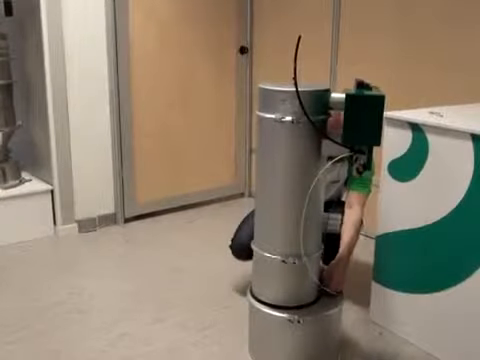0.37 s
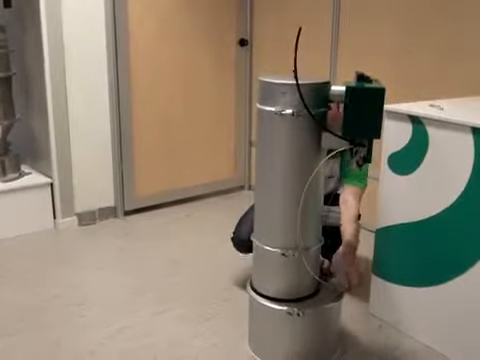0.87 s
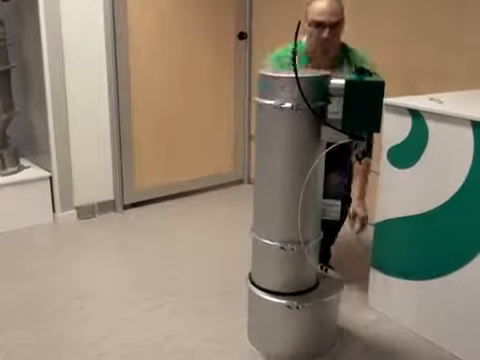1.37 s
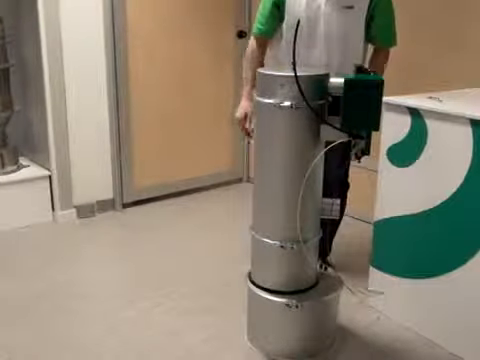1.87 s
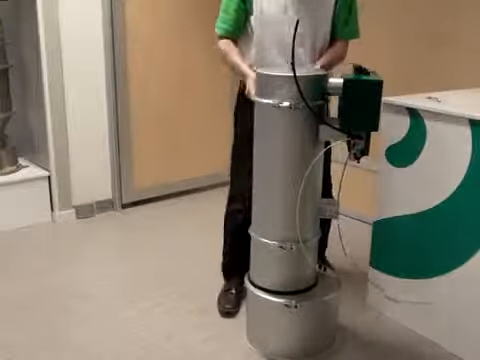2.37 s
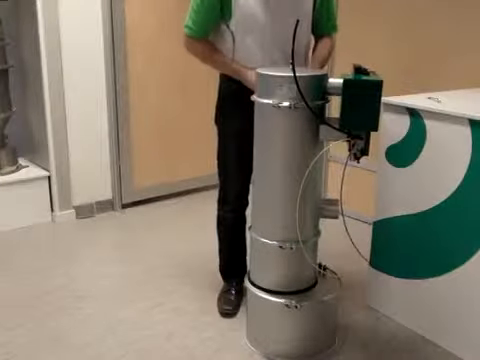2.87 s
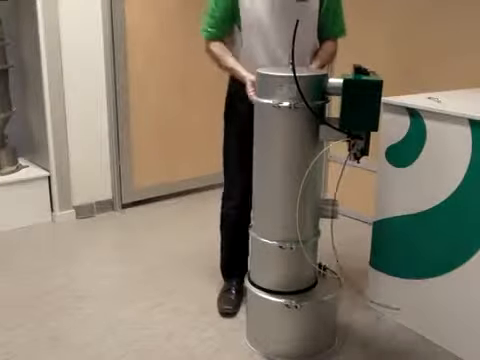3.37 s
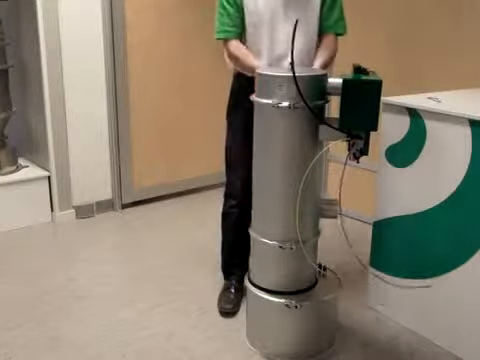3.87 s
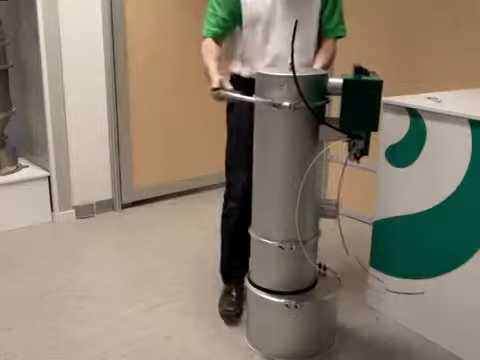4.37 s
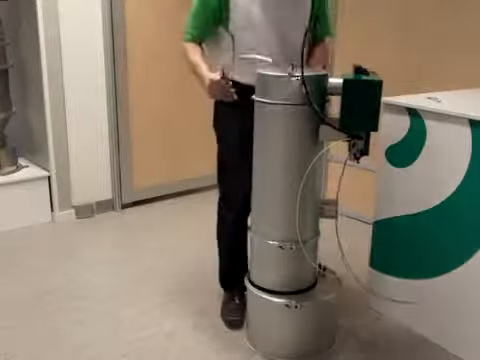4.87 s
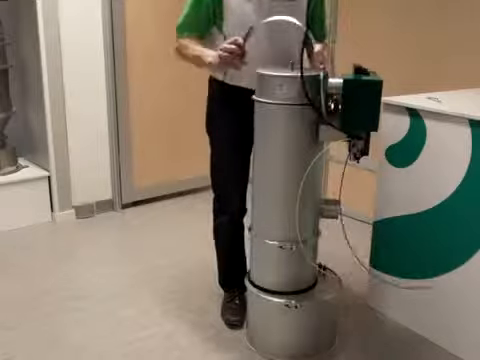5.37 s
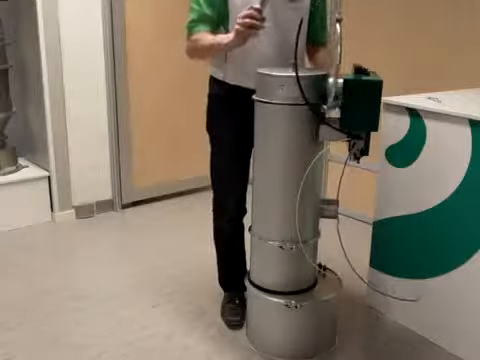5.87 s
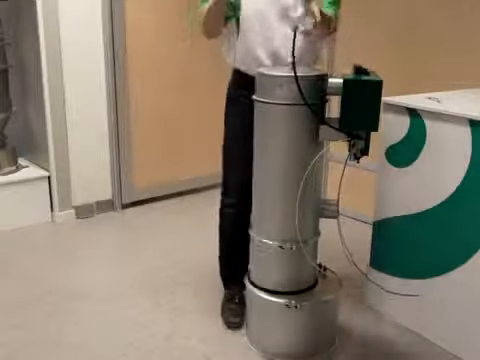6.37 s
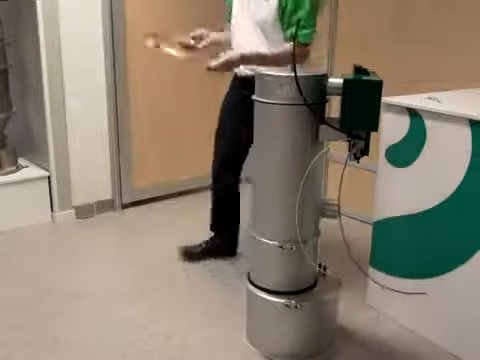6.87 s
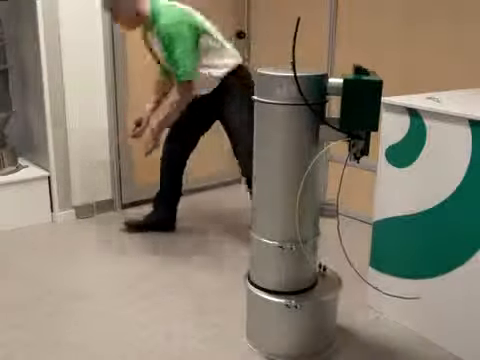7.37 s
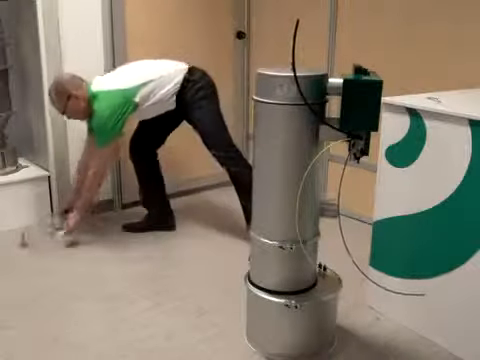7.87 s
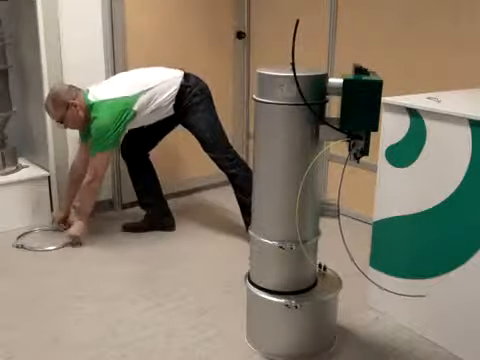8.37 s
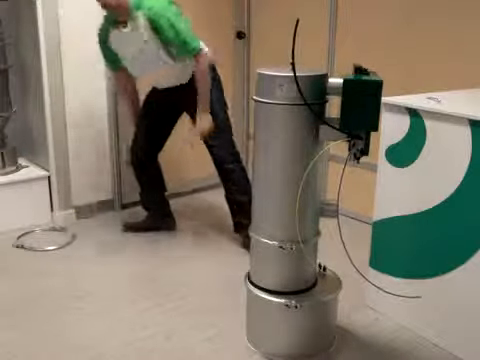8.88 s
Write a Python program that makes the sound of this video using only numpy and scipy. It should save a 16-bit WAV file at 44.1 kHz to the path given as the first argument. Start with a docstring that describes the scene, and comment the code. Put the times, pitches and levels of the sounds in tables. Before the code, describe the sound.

One early metal click and quiet taps, then hard latch snaps and irregular clanks against a hollow steel shell, the strongest with a short boomy ring. Light pings and clicks trail off as the ring is lifted away. A short pause, then it lands on the hard floor in two bursts of bright jangling and settles. Echoing bare room, constant low hiss, plain mono pickup.

```python
"""A steel clamp ring is unlatched, knocked against the lid and shell of a hollow steel machine, lifted off
and laid on a hard floor, where it rattles to rest. Each blow is a filtered noise snap with dying sines for
lid, shell or ring; the latch pings, clothes rustle and dull taps fall between. A bare room
answers the machine and the ring's jangle with two echoes and a sparse tail, over a steady hiss; the small
microphone has four narrow notches."""
import sys
import numpy as np
from scipy import signal
from scipy.fft import rfft, irfft
from scipy.io import wavfile
from scipy.ndimage import uniform_filter1d

SR = 44100
rng = np.random.default_rng(int(sys.argv[2]) if len(sys.argv) > 2 else 0)


def master_out(mix):
    """Clip the mix to full scale and print it as 16-bit PCM to the path in sys.argv[1]."""
    frames = np.transpose(np.atleast_2d(mix))
    ceiling = np.clip(frames, -1, 1)
    pcm = np.round(ceiling * 32767).astype(np.int16)
    wavfile.write(sys.argv[1], SR, pcm)


N = 396900  # 9 s


def gain_of(db):
    """Decibels to gain."""
    return 10 ** (np.asarray(db) / 20)


def read(points, hz):
    """Reads a table on a log-frequency axis."""
    f, value = np.transpose(points)
    return np.interp(np.log(hz + 1), np.log(f + 1), value)


def add(mix, s, sound):
    """Adds a sound at time s."""
    part = mix[round(s * SR):][:len(sound)]
    part += sound[:len(part)]


def loud(x):
    """Scales a blow so that its first 10 ms have an rms of one third, hence peak near 1."""
    return x / np.sqrt(np.mean(x[:SR // 100] ** 2)) / 3


def colour(x, db):
    """Causal filter with the given dB per bin: the phase follows from the log gain."""
    log_gain = np.log(gain_of(np.r_[db, db[-2:0:-1]]))
    response = np.fft.ifft(np.exp(np.conj(signal.hilbert(log_gain)))).real
    return signal.oaconvolve(x, response[:len(db) // 2])[:len(x)]


def noise(points):
    """Steady noise of rms 1 with the given spectrum."""
    spectrum = rfft(rng.standard_normal(N))
    x = irfft(spectrum * gain_of(read(points, np.fft.rfftfreq(N, 1 / SR))), N)
    return x / np.std(x)


def bank(modes, damping=1, split=0, count=1):
    """Half a second of one dying sine a mode; a bent or welded part adds close, faster-dying neighbours."""
    hz, db, t60 = np.repeat(modes, count, axis=0).T[:, :, None]
    neighbour = (np.arange(len(hz)) % count > 0)[:, None]
    hz = hz * (1 + split * neighbour * rng.standard_normal(hz.shape))
    t = np.arange(SR // 2) / SR
    fall_db = 60 * t * damping * (1 + neighbour) / t60
    return hz[:, 0], gain_of(db - 0.44 * neighbour - fall_db) * np.sin(2 * np.pi * hz * t)


def chatter(s, swell, spike=0.19):
    """Uneven micro-bounces that swell and then fade, with s seconds as the time constant of the fade."""
    t = np.arange(SR // 10) / max(s, 3e-4) / SR
    bounces = rng.standard_normal(len(t)) * rng.exponential(1, len(t)) ** spike
    return bounces * t ** swell * np.exp(-t)


def struck(modes, tilt_db, spread_db, rise=0.00053):
    """Each blow lands elsewhere, so it wakes the modes in other shares; the ringing builds over a moment."""
    share = gain_of(tilt_db + spread_db * rng.standard_normal(len(modes)))
    share = share * rng.choice([-1, 1], len(modes))
    build_up = 1 - np.exp(-np.arange(modes.shape[1]) / SR / max(rise, 1e-4))
    return loud(share @ modes * build_up)


def ticks(spells, per_s, spread_db):
    """Rows (s, dB) of unevenly spaced ticks of uneven size that fill each spell."""
    rows = []
    for start, length, db in spells:
        gap, size = rng.random((40, 2)).T
        times = start + np.cumsum(gap + .5) / per_s
        levels = db - spread_db * (1 + np.log(size + 0.095))
        rows += [(s, level) for s, level in zip(times, levels) if s < start + length]
    return rows


# Colour of the hiss. Each row: frequency in Hz, relative density in dB.
HISS_SPECTRUM = [(12, -51), (20, -9.5), (126, -9), (292, -6), (700, -9), (1180, -12.5), (2370, -14),
                 (2650, -20), (3500, -15.5), (5620, -17), (9830, -21.5), (15800, -27)]


def hiss():
    """Steady coloured noise under the whole place, at -56 dB rms."""
    return gain_of(-56) * noise(HISS_SPECTRUM)


# Clothes and shoes shuffle as the worker moves. Each row: time in seconds, level in dB (it glides between).
SHUFFLE_LEVELS = [(0.0, -58), (0.41, -74), (2.81, -62), (3.398, -56.5)]
# Colour of the cloth. Each row: frequency in Hz, relative density in dB.
CLOTH_SPECTRUM = [(150, -24), (400, 15), (1000, 14), (2500, 4), (6000, -7), (12000, -34.5)]


def shuffle():
    """Soft rustle of coloured noise that flutters a little and stops after the last row."""
    s, db = np.transpose(SHUFFLE_LEVELS)
    flutter_db = 0.19 * uniform_filter1d(rng.standard_normal(N), 900) * 30
    level_db = np.interp(np.arange(N) / SR, s, db, right=-99)
    return gain_of(level_db + flutter_db) * noise(CLOTH_SPECTRUM)


# Colour of the snap of steel on steel. Each row: frequency in Hz, relative level in dB.
CRACK_SPECTRUM = [(150, -103), (500, -11.5), (1000, -15.5), (2000, -11), (3200, -6), (4500, -3),
                  (6500, 1.5), (10000, -15.5), (13000, -22), (16000, -22)]


def crack(touch, hard_db, body_db=0):
    """The unpitched snap of steel on steel; a harder contact is brighter, a thin part has less body."""
    hz = np.fft.rfftfreq(4096, 1 / SR)
    tilt_db = hard_db * np.clip((hz - 4800) / 1200, 0, 1)
    tilt_db += (hard_db + 11.0) * np.clip((hz - 7500) / 4000, 0, 1)
    tilt_db += body_db * np.clip(2 - hz / 1000, 0, 1)
    return loud(colour(touch, read(CRACK_SPECTRUM, hz) + tilt_db))


# Low modes of the lid. Each row: frequency in Hz, relative level in dB, time to fall 60 dB in seconds.
LID_MODES = [(126, -15, 0.12), (201.7, -14, 0.61), (325, -9.5, 0.04), (358, -17, 0.16), (455, 4, 0.042),
             (527, -10, 0.078)]


def lid_boom():
    """Hollow boom: the lid's modes driven by a push of a few ms that sways at 430 Hz."""
    t = np.arange(SR // 140) / SR
    push = signal.windows.hann(len(t)) * (0.012 + np.cos(2 * np.pi * 430 * t))
    return loud(signal.fftconvolve(bank(LID_MODES)[1].sum(0), push))


# Modes of the shell. Each row: frequency in Hz, relative level in dB, time to fall 60 dB in seconds.
SHELL_MODES = [(680, -10, 0.039), (800, -5.5, 0.011), (958, 0, 0.021), (1090, -3, 0.015), (1330, 1, 0.017),
               (1600, 3, 0.012), (1844, 2, 0.016), (1953, 5, 0.01), (2150, -3.5, 0.03), (2300, -1, 0.024),
               (3700, 3, 0.013), (4280, -6.5, 0.016)]


def shell_bank():
    """The welded shell: each mode spreads into a dozen close, short notes."""
    return bank(SHELL_MODES, split=0.11, count=12)


# Loose parts drag and tick along the machine. Each row: start in seconds, length in seconds, tick level in dB.
DRAG_SPELLS = [(2.795, .022, -34.5), (3.91, 0.24, -36.5), (4.455, .05, -42), (5.2, 0.29, -51)]


def drags():
    """Each tick of a drag is a small blow: start, level, lid and shell re crack, hardness."""
    return [(s, db, -8, -4.5, -10) for s, db in ticks(DRAG_SPELLS, per_s=83, spread_db=-1)]


LEAD_S = .004  # snap and shell ringing start this long before the row time and swell up
# Blows on the machine. Each row: time in seconds, crack level in dB, lid boom in dB re crack,
# shell ring in dB re crack, hardness as treble in dB.
MACHINE_BLOWS = [(0.1967, -26.5, -34, -15.5, -8.5), (0.5383, -40.5, -31, -2.5, -8),
                 (0.5876, -45, -6, 5, -6), (2.316, -54, -5, 12, -1), (2.3515, -40, -12, -1.5, -7),
                 (2.8211, -13.5, -39, -14, -7.5), (2.858, -23, -5.5, -3.5, -8), (3.357, -39, -3, 1.5, -18),
                 (3.4318, -15, -15, -8, -7.5), (3.7665, -28.5, -0.5, 4.5, -3.5),
                 (3.9473, -18, -11.5, -3.5, -8.5), (4.0082, -24, -15, 1.5, -13),
                 (4.0444, -15.5, -16, -9.5, -7), (4.137, -26, -20, -9, -8), (4.4633, -39.5, 2, 4.5, -10),
                 (4.474, -38, 9, -3, 3), (4.4838, -40.5, 9.5, 6, -27), (4.573, -14.5, 1, -4.5, -1),
                 (4.616, -23.5, 0, 4.5, -25), (4.9009, -18, -4.5, 1.5, -9), (4.9392, -25, -8, 1.5, -26),
                 (5.189, -23.5, -16, -27, -5), (5.27, -32.5, -37, -6, -14), (5.3899, -32.5, -32, -15, -3),
                 (5.5619, -16.5, 10, 1.5, -8), (5.584, -23.5, -25, -15, -0.5), (6.232, -39, -28, -28, -8),
                 (6.4197, -28.5, -19, -9, -9.5), (6.6207, -38.5, -38, -24, -8), (6.6566, -42, -15, -4, -3)]


def knocks(shell):
    """Blows on the machine: snap, hollow boom of the lid, ring of the shell fed by the micro-bounces."""
    out, boom = np.zeros(N), lid_boom()
    for s, db, lid_db, shell_db, hard_db in MACHINE_BLOWS + drags():
        touch = chatter(0.0037, swell=1.624)
        ringing = signal.fftconvolve(struck(shell, 0, spread_db=2.5), touch)
        add(out, s - LEAD_S, gain_of(db) * crack(touch, hard_db, body_db=0.48 * lid_db))
        add(out, s, gain_of(db + lid_db) * boom)
        add(out, s - LEAD_S, gain_of(db + shell_db) * loud(ringing))
    return out


# Some blows also ring the shell near one pitch. Each row: time in seconds, level in dB, pitch in Hz.
SHELL_CLANKS = [(.196, -34.5, 2100), (2.821, -26, 2280), (6.42, -33.5, 1600), (2.821, -18.5, 4280),
                (3.431, -22.5, 1760), (3.766, -31.5, 1600), (4.008, -30, 3750), (4.473, -26.5, 1010),
                (4.901, -19, 958), (4.901, -15, 2150), (4.901, -19.5, 3700), (5.563, -25.5, 2200),
                (5.585, -29, 4350)]


def clanks(shell_hz, shell):
    """The shell clanks near one pitch: modes away from it fall by 81 dB an octave."""
    out = np.zeros(N)
    for s, db, pitch_hz in SHELL_CLANKS:
        clank = struck(shell, -81 * abs(np.log2(shell_hz / pitch_hz)), spread_db=2.0)
        touch = chatter(0.0039, swell=0.81)
        add(out, s - LEAD_S, gain_of(db) * loud(signal.fftconvolve(clank, touch)))
    return out


# Single echoes off floor and walls. Each row: delay in seconds, level in dB.
SINGLE_ECHOES = [(.011, -10), (.021, -12.5)]
# How long the bare room rings. Each row: frequency in Hz, time to fall 60 dB in seconds.
ROOM_T60 = [(200, 0.87), (500, 0.84), (1400, 0.66), (3700, 0.6), (7000, 0.41), (14000, 0.29)]
# Strength of the room's tail. Each row: frequency in Hz, level in dB.
TAIL_STRENGTH = [(300, -10.5), (1000, -4.5), (4000, -6.5), (12000, -6)]


def room_tail():
    """Sparse random taps, one in every 20 samples, that die at their own rate in each band."""
    pulses = np.zeros(SR)
    at = np.arange(300, SR - 20, 20)
    pulses[at + rng.integers(0, 20, len(at))] = rng.choice([-1., 1.], len(at))
    hz, frame_s, z = signal.stft(pulses, SR, nperseg=256)
    decay = gain_of(-60 * frame_s / read(ROOM_T60, hz)[:, None])
    tail = signal.istft(z * decay, SR, nperseg=256)[1]
    return colour(tail / np.linalg.norm(tail), read(TAIL_STRENGTH, hz))


def room(x):
    """Echoes of the treble, then a tail; three tails take turns so like blows differ.
    Above the boom they swap within one blow, as each micro-bounce sounds from another spot: the wash is smooth."""
    out, t = x.copy(), np.arange(N) / SR
    low = signal.sosfiltfilt(signal.butter(4, 650, fs=SR, output="sos"), x)
    treble = x - low
    for s, db in SINGLE_ECHOES:
        add(out, s, gain_of(db) * treble)
    for k in range(3):
        turn = k * np.pi / 3
        feed = low * np.cos(2.331 * t + turn) + treble * np.cos(330 * t + turn)  # rates in rad/s
        # the squares of the three turns add up to 3/2
        out += signal.fftconvolve(np.sqrt(2 / 3) * feed, room_tail())[:N]
    return out


# Dry taps and soft steps as the worker moves, and the low thud under the blow at 4.573 s.
# Each row: time in seconds, level in dB, pitch in Hz.
DULL_TAPS = [(0.568, -34.5, 1127), (.589, -44, 2070), (.6, -43.5, 555), (1.744, -36.5, 1600),
             (1.741, -46, 970), (1.819, -47, 1320), (1.923, -39.5, 1530), (2.08, -52, 870),
             (2.155, -44, 1600), (2.24, -47, 703), (4.574, -23, 301), (7.27, -45, 800), (7.601, -42, 431)]


def dull_taps():
    """Short dull knocks: a small cluster of damped notes each; lower taps last longer."""
    out = np.zeros(N)
    for s, db, hz in DULL_TAPS:
        t60 = 0.11 * (1000 / hz) ** 1.1  # 0.11 s at 1 kHz
        notes = bank([(hz, 0, t60)], split=0.164, count=4)[1]
        add(out, s, gain_of(db) * struck(notes, 0, spread_db=3.0))
    return out


# Thin notes of the lid and shell linger after some blows. Each row: time in seconds, level in dB, pitch in Hz.
THIN_NOTES = [(4.575, -50, 1440), (4.618, -36.5, 1715), (4.618, -43, 1890), (4.903, -47, 395),
              (4.903, -38.5, 532), (4.903, -48, 1104), (4.903, -40, 1646), (4.903, -40, 2060),
              (4.903, -48, 3698), (5.575, -31.5, 452), (5.565, -37, 1314)]


def hums():
    """Thin notes of the lid and shell that beat against a close neighbour; the main one falls 60 dB in 0.47 s."""
    out = np.zeros(N)
    for s, db, hz in THIN_NOTES:
        add(out, s, gain_of(db) * bank([(hz, 0, 0.47)], split=0.0049, count=2)[1].sum(0))
    return out


# Modes of the latch. Each row: frequency in Hz, relative level in dB, time to fall 60 dB in seconds.
LATCH_MODES = [(3100, 4.5, 0.043), (4390, -1.5, 0.17), (5280, -8, 0.15), (6640, 3, 0.036), (7230, 19, 0.13)]
# The loose latch pings. Each row: time in seconds, level in dB before the mode's own,
# pitch of the struck spot in Hz.
LATCH_PINGS = [(5.271, -28, 4310), (5.386, -36, 3020), (5.406, -42, 3110), (5.465, -43, 4390),
               (6.42, -27, 5280), (7.502, -24, 5280)]


def latch():
    """Clear notes: modes fall by 70 dB for each octave from the struck spot, so the nearest speaks."""
    out, (hz, modes) = np.zeros(N), bank(LATCH_MODES)
    for s, db, spot_hz in LATCH_PINGS:
        add(out, s, gain_of(db - 70 * abs(np.log2(hz / spot_hz))) @ modes)
    return out


# The ring scrapes and rattles on the floor. Each row: start in seconds, length in seconds, tick level in dB.
RATTLE_SPELLS = [(7.43, .06, -37), (7.51, 0.03, -30), (8.2, .07, -25), (8.29, .09, -39)]


def rattles():
    """Each tick of a rattle is a small clink: start, level, ringing re crack, chatter, spot pitch."""
    return [(s, db, -12, 0.0051, 3600) for s, db in ticks(RATTLE_SPELLS, per_s=110, spread_db=4)]


# Modes of the free ring. Each row: frequency in Hz, relative level in dB, time for the clear tone to fall
# 60 dB in seconds (the jangle dies faster).
RING_MODES = [(1125, -14.5, 0.97), (2071, -1, 0.25), (2930, -1, 0.23), (2990, -9.5, 0.11), (3070, -2, 0.35),
              (3130, -10, 0.32), (3520, -3, 0.21), (3790, -19, 0.36), (4195, 0.5, 0.58), (4373, -1, 0.18),
              (4613, -7, 0.55), (5400, 3.5, 0.25), (6530, -8, 0.32), (7090, 3, 0.58), (9360, -0.5, 0.3),
              (11760, -6.5, 0.35)]
# The free ring clinks and lands on the floor. Each row: time in seconds, crack level in dB,
# ringing in dB re crack, chatter in seconds, pitch of the spot in Hz.
RING_CLINKS = [(7.087, -45, -0.5, 0.014, 4030), (7.301, -30, -4, 0.0071, 4500),
               (7.4915, -20, -16, 0.0076, 4240), (7.5038, -15.5, 1.5, 0.0065, 5400),
               (7.517, -15, -9, 0.0034, 2900), (7.535, -19, 0, 0.004, 4430), (7.885, -26, 3, 0.0032, 3800),
               (7.8938, -15.5, -2, 0.0051, 4340), (8.0399, -29.5, -1, 0.019, 2940),
               (8.0527, -24.5, -9, 0.0098, 3870), (8.1153, -26.5, 5.5, 0.016, 2920),
               (8.126, -28.5, 2.5, 0.0033, 3100), (8.168, -27, 1, 0.0031, 2110),
               (8.1743, -16.5, 1.5, 0.0082, 4050), (8.191, -18.5, 4, 0.011, 4360),
               (8.268, -17.5, 1, 0.0079, 3600), (8.2826, -18.5, 6.5, 0.0032, 3100),
               (8.3056, -12.5, 1.5, 0.00027, 3100), (8.3197, -22, 1, 0.0032, 3100),
               (8.345, -22, -10, 0.001, 3450)]


def ring():
    """Snap and a rough jangle whose colour follows the spot that lands; apart, the clear tones that outlast it."""
    tones, (tone_hz, clear) = np.zeros(N), bank(RING_MODES)
    jangle, (hz, modes) = np.zeros(N), bank(RING_MODES, damping=2.6, split=0.0185, count=8)
    for s, db, ring_db, chatter_s, spot_hz in RING_CLINKS + rattles():
        hard_db = 2.5 + 0.36 * db  # a stronger landing is brighter
        near_db = np.maximum(-22 * abs(np.log2(hz / spot_hz)), -12)
        near_db = near_db + (hz > 5200) * (hard_db + 3.5)
        tone_near_db = -4 * abs(np.log2(tone_hz / spot_hz))
        add(jangle, s, gain_of(db) * crack(chatter(chatter_s, swell=0.73), hard_db, body_db=-5.5))
        add(jangle, s, gain_of(db + ring_db) * struck(modes, near_db, spread_db=4.0, rise=0.00056))
        # the clear tones lie 15.5 dB under the jangle
        add(tones, s, gain_of(db + ring_db - 15.5) * struck(clear, tone_near_db, spread_db=3.0))
    return jangle, tones


def scene():
    """Machine and jangle sound in the room; the other layers reach the microphone without its answer."""
    shell_hz, shell = shell_bank()
    machine = knocks(shell) + clanks(shell_hz, shell)
    jangle, tones = ring()
    mix = room(machine + jangle) + tones + hums() + latch() + dull_taps() + shuffle() + hiss()
    return mix[None]


# Narrow notches of the microphone housing. Each row: centre in Hz, width in Hz, depth in dB.
HOUSING_NOTCHES = [(2683, 210, -20), (5030, 515, -16.5), (5690, 525, -18), (7875, 1380, -11.5)]


def microphone(x):
    """The microphone housing cuts narrow notches and the band ends steeply above 15.75 kHz."""
    hz = np.fft.rfftfreq(8192, 1 / SR)
    db = np.zeros(len(hz))
    for centre_hz, width_hz, depth_db in HOUSING_NOTCHES:
        dip = (1 - gain_of(depth_db)) / (1 + (2 * (hz - centre_hz) / width_hz) ** 2)
        db += 20 * np.log10(1 - dip)
    db -= 40 * np.clip((hz - 15750) / 500, 0, 1)
    return colour(x, db)


def roll_off(x):
    """The treble ends steeply here."""
    return signal.sosfilt(signal.butter(12, 16650, fs=SR, output="sos"), x)


def record(dry):
    """One small microphone takes the whole place in mono."""
    mix = microphone(dry[0])[None]
    return roll_off(mix)


dry = scene()
out = record(dry)
master_out(out)
```